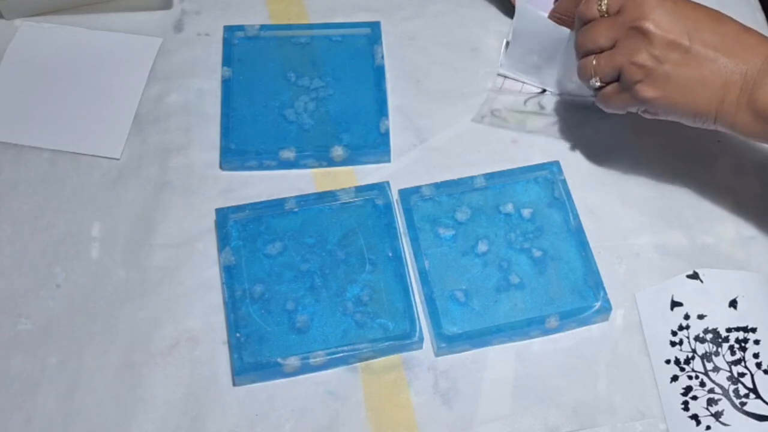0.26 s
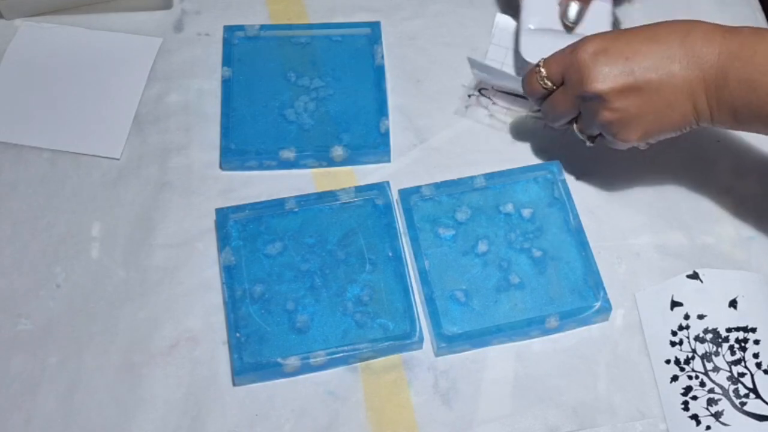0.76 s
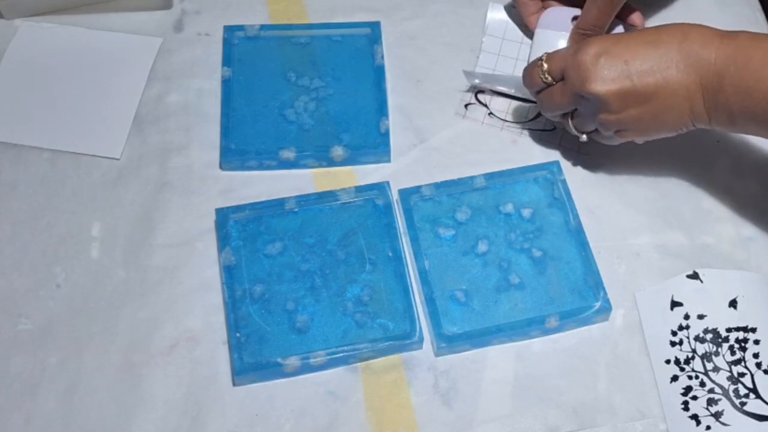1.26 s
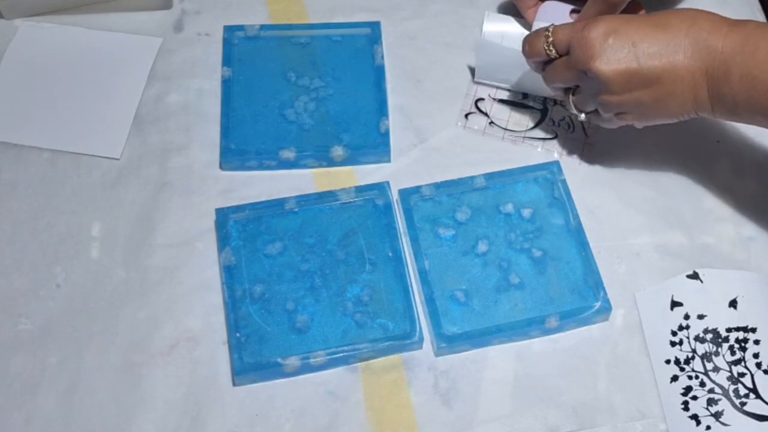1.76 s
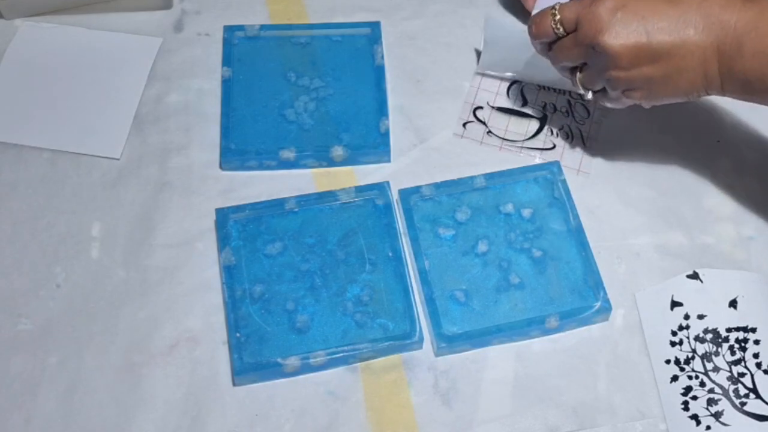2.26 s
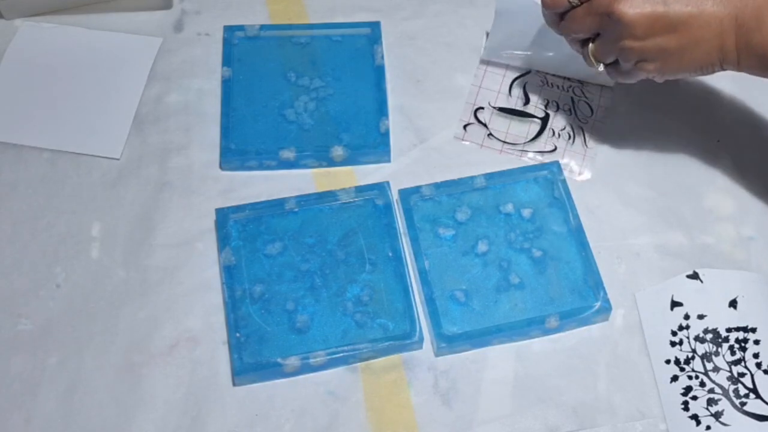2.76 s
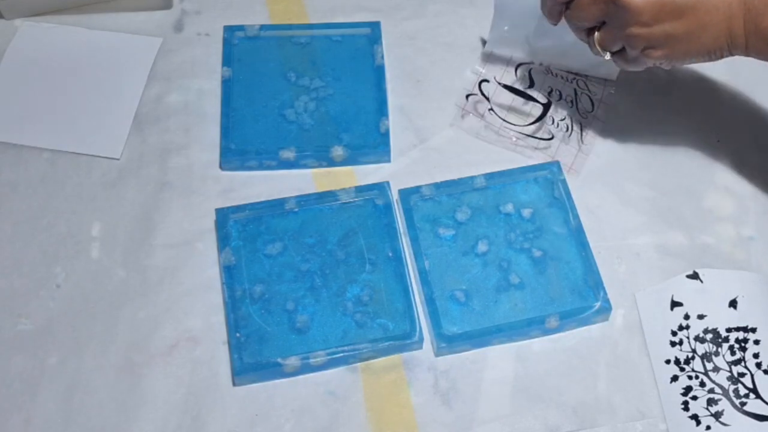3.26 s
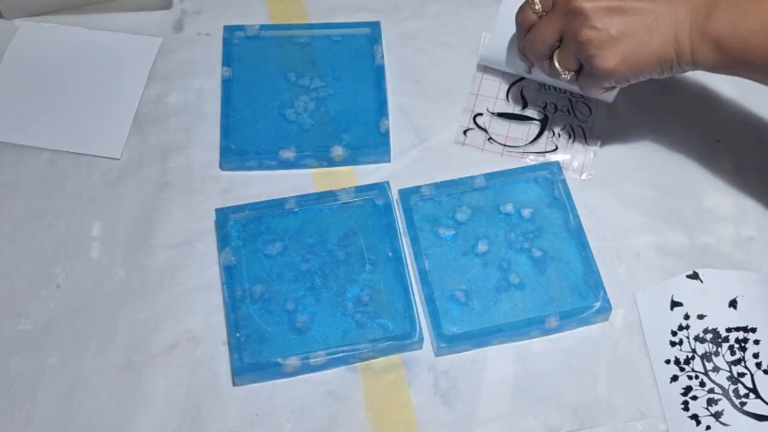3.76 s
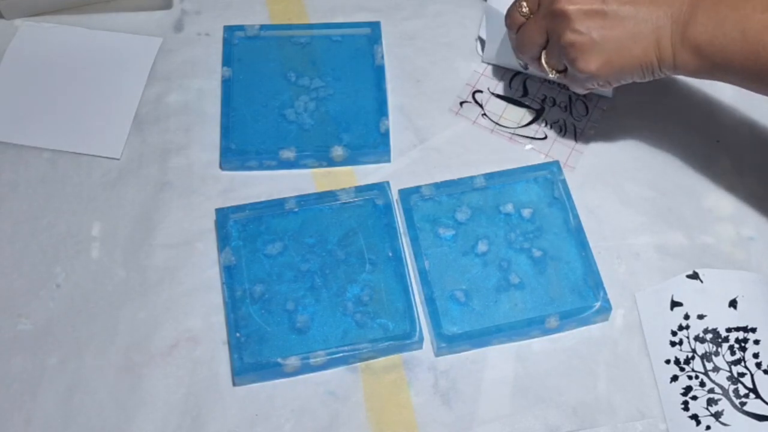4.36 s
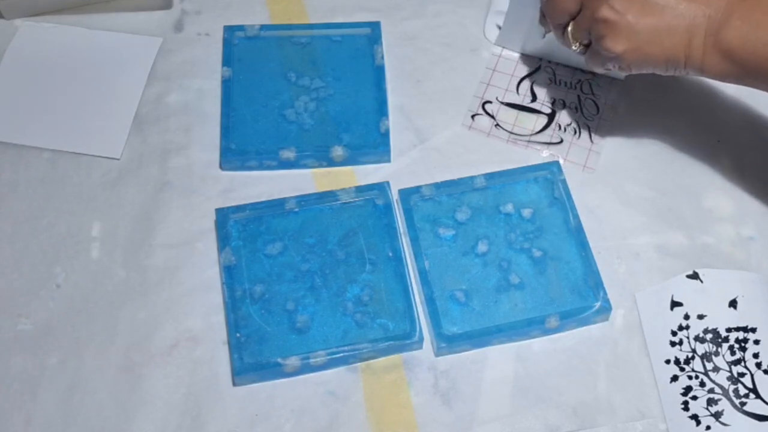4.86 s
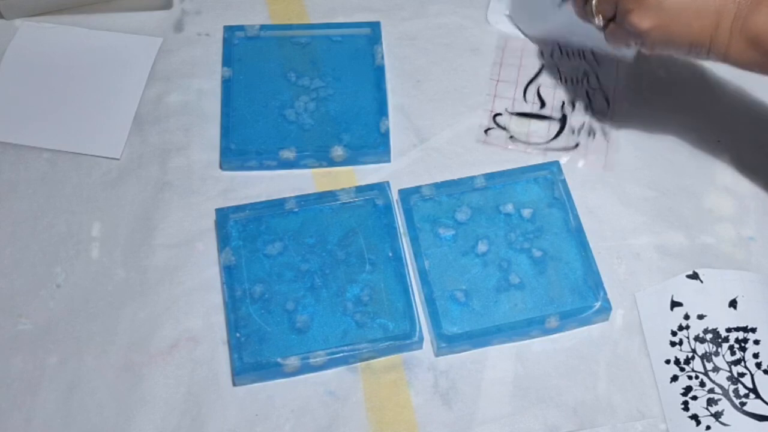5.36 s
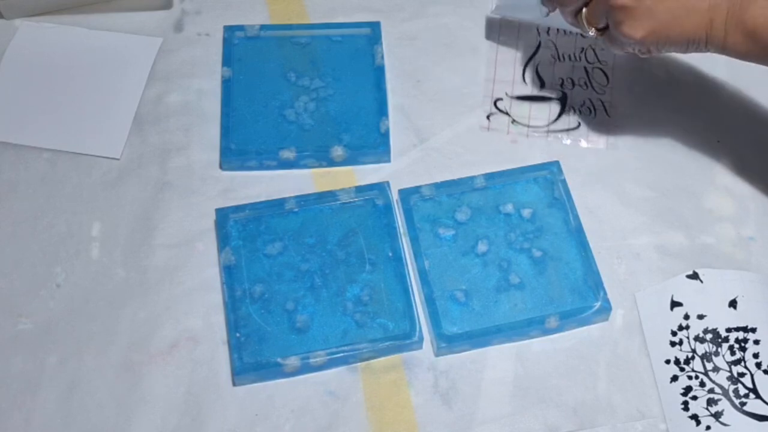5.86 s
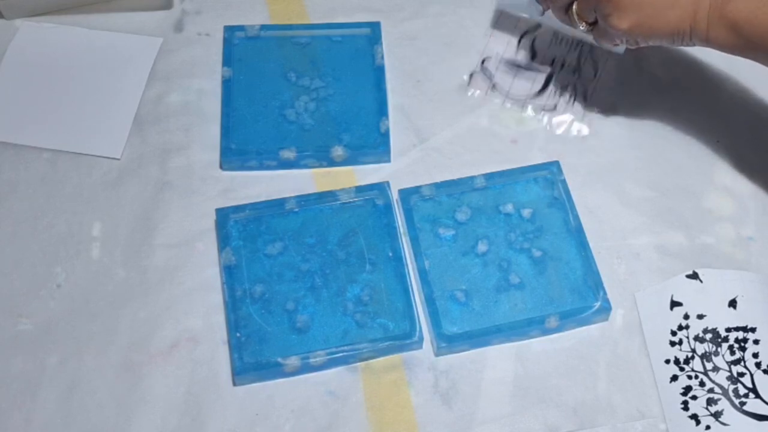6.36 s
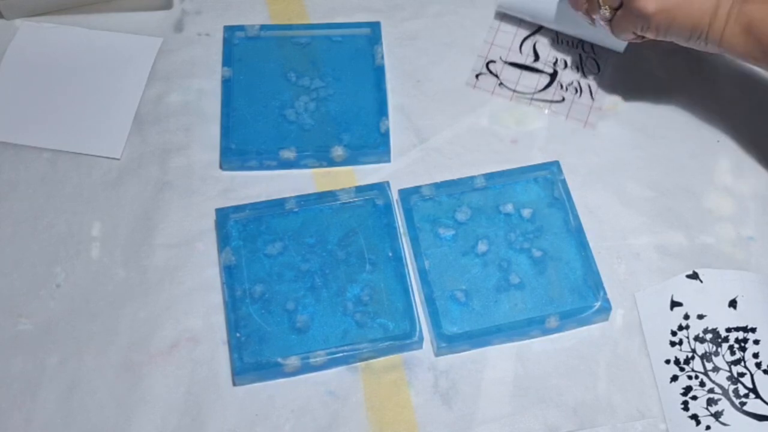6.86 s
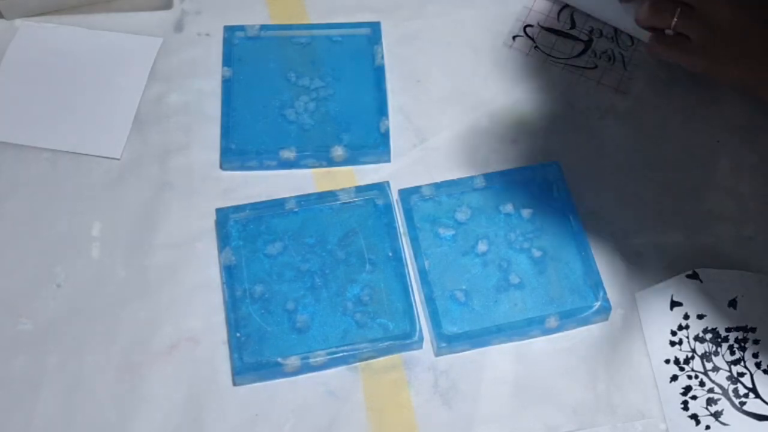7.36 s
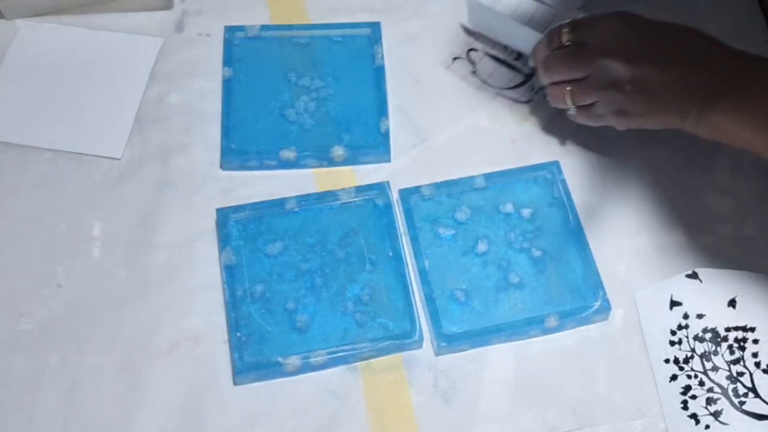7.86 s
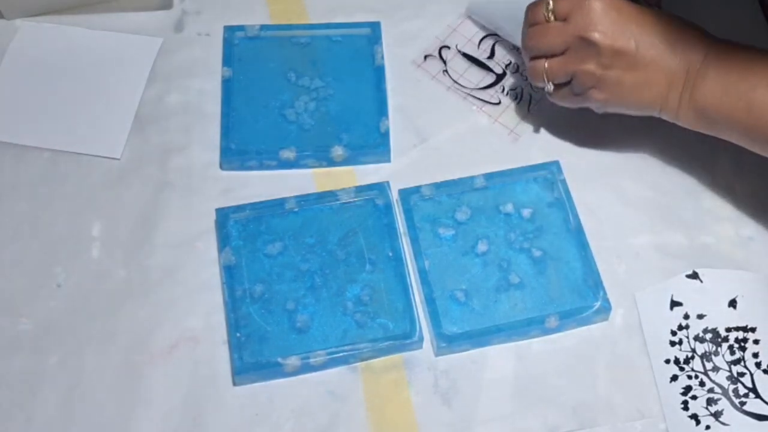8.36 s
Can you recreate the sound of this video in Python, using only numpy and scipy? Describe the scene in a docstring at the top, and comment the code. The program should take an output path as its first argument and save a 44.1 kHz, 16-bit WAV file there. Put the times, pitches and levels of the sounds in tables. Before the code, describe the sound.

At a table in a small room, hands pull a stiff backing sheet off sticky film. Glue crackles and the film slides while the sheet buckles in dull or bright snaps with hollow flaps. Soft low bumps come from the hands. Snaps crowd around 4.5 and 5.3 seconds, thin out, then return in a final flurry. Close stereo microphones catch quiet room air and a throbbing hum.

```python
"""From the start hands pull a stiff backing sheet off sticky tape at a table in a small room: glue crackles, film slides.
Over that come snaps, dull or bright, each with a hollow flap as the sheet buckles, and soft bumps of the hands on the table.
The snaps crowd together near 4.5 s and 5.3 s, then grow sparse; a hand drags softly over the table near 6.9 s.
A last flurry of snaps comes near 8.5 s. Room air and a low hum that throbs about every two seconds run throughout.
Snaps and crackle are shaped noise, flaps and booms are fading sine waves, and the hum is one wavering sine."""
import sys
import numpy as np
from scipy import signal
from scipy.fft import rfft, irfft, next_fast_len
from scipy.io import wavfile
from scipy.ndimage import uniform_filter1d

SR = 44100
rng = np.random.default_rng(int(sys.argv[2]) if len(sys.argv) > 2 else 0)


def master(y):
    """Save y as 16-bit WAV."""
    cut = np.clip(np.atleast_2d(y).T, -1, 1)
    pcm = np.round(cut * 32767)  # scale
    wavfile.write(sys.argv[1], SR, pcm.astype(np.int16))


N = 380141
TIME = np.arange(N) / SR

# the sheet buckles: t/s, pitch of the flapping panel f/Hz, flap level/dB, snap level/dB,
# brightness/dB (crack against snap); the layers are trimmed further in buckling()
BUCKLE_EVENTS = [(0.0985, 1070, -56.5, -57.5, -26), (0.209, 690, -75, -62, 1), (0.3356, 940, -50, -60, -21),
                 (0.3832, 748, -49.5, -67, -16), (0.4594, 874, -34.5, -42.5, 1.5),
                 (0.5141, 685, -45.5, -62, -4.5), (0.548, 1005, -41, -52, -3.5),
                 (0.5667, 977, -30, -25.5, -4), (0.57, 1078, -36, -24.5, -3.5),
                 (0.831, 1010, -46, -49.5, -19), (0.8366, 1110, -55, -43, -7.5),
                 (0.878, 1100, -67, -65.5, 7.5), (1.0165, 1024, -62, -63.5, -9),
                 (1.339, 1050, -39.5, -43, -14.5), (1.367, 860, -64, -35, -7), (1.473, 910, -80, -75, 11.5),
                 (1.519, 1040, -46, -44, -21), (1.55, 1010, -38.5, -45, -12), (1.7076, 960, -86, -67.5, 11),
                 (1.7212, 965, -50.5, -42, -33.5), (1.752, 790, -42, -53, -11),
                 (1.8158, 720, -77, -68, 11.5), (1.8758, 920, -27, -27.5, -4),
                 (1.9491, 1130, -54.5, -68.5, 15), (2.1864, 1040, -56.5, -49.5, 8),
                 (2.2548, 1130, -56, -58, 2), (2.276, 1100, -58, -64, 15), (2.317, 1170, -80, -59, 1),
                 (2.397, 930, -62, -59.5, 5.5), (2.429, 980, -66, -47.5, -1),
                 (2.658, 940, -76, -48.5, -3.5), (2.696, 938, -43.5, -29, -2.5),
                 (3.029, 935, -80, -58, -4.5), (3.343, 950, -35, -32, -17),
                 (3.3989, 1050, -41.5, -44.5, -32), (3.4399, 1110, -44, -29.5, -7.5),
                 (3.448, 1090, -40, -42.5, -0.5), (3.484, 1160, -56, -48.5, 0),
                 (3.611, 1000, -48.5, -68, -3), (3.732, 1060, -53.5, -69, -5),
                 (3.78, 1070, -55, -52.5, -12), (4.4652, 790, -33.5, -44, -33),
                 (4.4886, 860, -47, -47, -25), (4.4955, 920, -25.5, -28.5, -0.5),
                 (4.5237, 790, -30.5, -31, -10.5), (4.5482, 1027, -30, -33.5, -17.5),
                 (4.599, 950, -33.5, -39, -24), (4.6957, 1110, -59.5, -60.5, 6.5),
                 (4.8782, 1102, -48, -33.5, 7), (4.985, 823, -60, -71, 13.5), (5.129, 806, -48, -63, 3.5),
                 (5.1802, 850, -45.5, -69.5, 3), (5.27, 810, -50, -50.5, 10.5),
                 (5.2736, 818, -35, -47, 7.5), (5.3024, 803, -46.5, -43, 6.5), (5.3127, 748, -40, -44, 15),
                 (5.319, 827, -54, -38.5, -17.5), (5.3703, 860, -31, -32, 3.5),
                 (5.377, 852, -35.5, -27, -1.5), (5.3869, 845, -26, -34.5, -11),
                 (5.393, 787, -36, -27.5, -6.5), (5.812, 662, -60.5, -80, 7), (6.4159, 940, -60, -51, 3.5),
                 (7.1729, 865, -50, -55.5, -1.5), (7.258, 1070, -69, -58, -7),
                 (7.7244, 1230, -63, -49.5, 4), (7.8637, 810, -58.5, -59.5, -8),
                 (8.2856, 805, -49.5, -55, -16), (8.376, 880, -60, -56.5, 0.5),
                 (8.4345, 1110, -39, -42, -29), (8.4601, 1140, -31, -31, -17),
                 (8.4777, 1140, -24, -31.5, 4), (8.481, 1110, -37, -23.5, -18.5),
                 (8.497, 1210, -38, -39.5, -6), (8.5397, 713, -33, -63, -1), (8.572, 850, -60, -46.5, 4.5),
                 (8.59, 820, -65, -52.5, -3)]
DULL_BELOW_DB = -6   # a snap with less brightness than this counts as dull


def from_db(db):
    """Turn decibels into gain."""
    return 10 ** (np.asarray(db) / 20)


def rms_one(x):
    """Scale to an average power of 1."""
    return x / np.sqrt(np.mean(x ** 2) + 1e-20)


def at_hz(points, hz):
    """Read a table between its points, on a log-frequency axis."""
    f, value = np.transpose(points)
    return np.interp(np.log(hz + 1), np.log(f + 1), value)


def band(x, low_hz, high_hz, order=3):
    """Keep only the sound between two frequencies."""
    high_hz = min(high_hz, SR / 2 - 500)
    sos = signal.butter(order, [low_hz, high_hz], "band", fs=SR, output="sos")
    return signal.sosfilt(sos, x + 1e-18)


def soft_band(x, low_hz, high_hz):
    """Band-pass with a gentle foot and a steep top."""
    top = signal.butter(4, min(high_hz, SR / 2 - 500), fs=SR, output="sos")
    return signal.sosfilt(top, band(x, low_hz, high_hz, order=2))


def drift(rate):
    """Slow random wandering of spread 1, with `rate` new values per second."""
    knots = rng.standard_normal(int(N / SR * rate) + 2)
    return rms_one(np.interp(TIME * rate, np.arange(len(knots)), knots))


def stereo_noise(size, apart):
    """Noise that both sides share, plus a part of each side's own."""
    white = rng.standard_normal((3, *size))
    return white[0] + apart * white[1:]


def place(bursts, times, level_db):
    """Lay stereo bursts out in time; a level is the burst's energy spread over 10 ms."""
    length = bursts.shape[-1]
    out = np.zeros((2, N + length))
    power = np.mean(np.sum(bursts ** 2, axis=-1), axis=0) / (.01 * SR)
    for k, s in enumerate(times):
        start = max(int(s * SR), 0)
        out[:, start:start + length] += bursts[:, k] * from_db(level_db[k]) / np.sqrt(power[k])
    return out[:, :N]


def resonance(hz, centre_hz, width_hz):
    """Response of one damped mode, 1 at its centre."""
    return 1j * hz * width_hz / (centre_hz ** 2 - hz ** 2 + 1j * hz * width_hz)


def background():
    """Room air is noise of a set colour; the low hum is a slightly unsteady sine that throbs slowly and evenly."""
    # colour of the room air: f/Hz, relative level/dB per Hz
    air_colour = [(15, -34.5), (25, -4.5), (84, 1), (223, -17.5), (309, -2.5), (451, -13.5), (503, -1.5),
                  (560, -12), (1370, -10), (1610, -15.5), (1790, -12.5), (3430, -12.5), (7510, -27.5),
                  (13600, -26), (16000, -32.5)]
    air_db, hum_hz, hum_wander_hz, hum_waver_db = -69.5, 49.8, 1.1, 1.1
    swell_db, trough_db = -60, -79   # the swell is added to the trough
    throb_s, throb_peak_s = 2.11, 4.333
    throb_shape = 2.5   # the higher, the longer the hum stays low
    size = next_fast_len(N)
    hz = np.arange(size // 2 + 1) * SR / size
    spectrum = rfft(stereo_noise((size,), apart=1.0)) * from_db(at_hz(air_colour, hz))
    air = rms_one(irfft(spectrum, size))[:, :N]
    hum = np.sin(2 * np.pi * np.cumsum(hum_hz + hum_wander_hz * drift(6)) / SR)
    swell = np.abs(np.cos(np.pi * (TIME - throb_peak_s) / throb_s)) ** throb_shape
    throb = from_db(trough_db) + from_db(swell_db) * swell
    return from_db(air_db) * air + throb * from_db(hum_waver_db * drift(12)) * hum


def pulling():
    """Each pull swells and fades; a brighter one has less rub and more fizz. Power of rub, scrape, fizz and sizzle."""
    # the hand pulls the sheet: t/s of the fastest moment, rise/s, fall/s, scrape level/dB, brightness/dB
    pulls = [(0.029, 0.12, 0.04, -55.5, -4.5), (0.191, 0.075, 0.048, -62.5, -8.5),
             (.5, 0.062, 0.055, -59, -15.5), (.575, .015, 0.015, -41.5, -2),
             (1.05, 0.026, 0.045, -66.5, -4.5), (1.55, 0.047, 0.013, -54.5, -9.5),
             (1.78, 0.13, 0.075, -66, -10), (1.885, 0.023, 0.035, -50, -6), (2.2, 0.046, 0.11, -61.5, -2.5),
             (2.42, 0.052, 0.031, -62, 2), (2.63, 0.088, 0.12, -70.5, -0.5),
             (2.705, 0.022, 0.036, -54.5, 1.5), (2.989, 0.06, 0.13, -66, -6.5),
             (3.342, 0.0091, 0.013, -56.5, -19), (3.4, 0.025, 0.1, -55, -12),
             (3.779, 0.077, 0.048, -58.5, -3), (3.889, 0.035, .025, -65.5, -4),
             (4.299, .14, .1, -72.5, -2.5), (4.73, 0.23, .11, -66.5, -0.5),
             (4.885, 0.021, 0.065, -53, -0.5), (5.33, 0.039, 0.065, -46, 1), (5.58, 0.041, .1, -73.5, -4.5),
             (6.03, 0.16, 0.13, -72.5, 4), (6.2, 0.036, 0.026, -65.5, 1.5),
             (6.378, 0.065, 0.056, -57.5, 2.5), (6.83, 0.11, 0.18, -73, 3.5),
             (7.161, 0.11, 0.043, -67, 4.5), (7.34, 0.032, .04, -71, -1.5), (7.48, 0.039, 0.063, -71, 0.5),
             (7.659, 0.03, .03, -64, -1.5), (7.727, 0.015, .012, -59, 7), (7.775, 0.041, 0.044, -63.5, 3),
             (7.879, 0.035, 0.095, -75.5, 7), (8.258, 0.037, 0.021, -62, -4),
             (8.409, 0.02, 0.034, -66.5, -4), (8.58, 0.12, 0.12, -54, -5)]
    shape = 1.5   # 1 is a pointed swell, 2 a rounded one
    rub_db, fizz_db, sizzle_db = -4, 1, -6   # against the scrape
    rub_falls, sizzle_follows = .45, 1.1   # shares of the brightness
    power = np.zeros((4, N))
    for s, rise_s, fall_s, db, bright_db in pulls:
        near = np.abs(TIME - s) < 1 / 2
        t = TIME[near] - s
        swell = np.exp(-np.abs(t / np.where(t < 0, rise_s, fall_s)) ** shape)
        colour_db = np.array([rub_db - rub_falls * bright_db, 0, fizz_db + bright_db,
                              sizzle_db + sizzle_follows * bright_db])
        power[:, near] += np.outer(from_db(db + colour_db), swell) ** 2
    return power


def buckle_levels():
    """A sharper crease is brighter, most of all at its top edge. Levels of flap, snap, crack and edge in dB."""
    edge_offset_db, edge_follows, dull_follows = -11.5, 1.42, 1.2
    _, _, flap_db, snap_db, bright_db = np.transpose(BUCKLE_EVENTS)
    dullness_db = np.minimum(bright_db - DULL_BELOW_DB, 0)
    # a dull crease loses its edge fast
    edge_db = edge_offset_db + edge_follows * bright_db + dull_follows * dullness_db
    return flap_db, snap_db, snap_db + bright_db, snap_db + edge_db


def settling():
    """After a buckle the sheet slides on in a dying rustle. Power of rub, scrape, fizz and sizzle."""
    t60_s = 0.33   # time to fade by 60 dB
    share_db = np.array([-22, -21, -26, -18.5])   # against flap, snap, crack and edge
    kicks = np.zeros((4, N))
    starts = (np.array(BUCKLE_EVENTS)[:, 0] * SR).astype(int)
    kicks[:, starts] = from_db(np.array(buckle_levels()) + share_db[:, None]) ** 2
    return signal.lfilter([1], [1, -from_db(-60 / (t60_s * SR)) ** 2], kicks + 1e-18)


def crackle(low_hz, high_hz, per_s, size_db, smooth_db):
    """Tiny threads of glue and fibres let go at random, over the smooth hiss of sliding."""
    born = rng.random(N) < per_s / SR
    sizes = from_db(size_db * np.minimum(rng.exponential(1, N), 4))
    # each grain fades over about 4 ms
    grains = signal.lfilter([1], [1, -np.exp(-1 / (0.004 * SR))], born * sizes + 1e-18)
    friction = (rms_one(grains) + from_db(smooth_db)) * stereo_noise((N,), apart=0.56)
    return rms_one(band(friction, low_hz, high_hz, order=2))


def sheet_colour(hz):
    """Each resonance of sheet and table top together lifts or hollows out a band."""
    # resonances: centre f/Hz, width/Hz, boost level/dB (negative makes a hollow)
    sheet_modes = [(1284, 120, -7), (1522, 60, 6.5), (1611, 68, -17.5), (1660, 19, 7), (1790, 19, 7),
                   (2052, 50, 6.5), (2446, 190, -2), (2690, 17, 8), (2850, 30, 3), (3030, 39, 8),
                   (3500, 960, 4), (4720, 560, 5), (5810, 460, 6), (7040, 630, -2.5), (7830, 110, 4.5)]
    lifts = [1 + (from_db(db) - 1) * resonance(hz, centre, width) for centre, width, db in sheet_modes]
    return np.prod(lifts, axis=0)


def flexing(x, patchy_db):
    """The sheet's resonances colour the rustle; as it bends, patches of pitch grow louder and softer."""
    hz, _, frames = signal.stft(x, SR, nperseg=1024)
    patches = rng.standard_normal(frames.shape[1:])
    patches = uniform_filter1d(patches, size=5, axis=0)   # smooth over pitch
    patches = uniform_filter1d(patches, size=9, axis=1)   # smooth over time
    gain = from_db(patchy_db * rms_one(patches)) * np.abs(sheet_colour(hz))[:, None]
    return signal.istft(frames * rms_one(gain), SR)[1][:, :N]


def peeling():
    """The sheet slides over the table and the tape pulls away, with stray ticks where the glue holds on."""
    pull = pulling()
    rub_gain, scrape_gain, fizz_gain, sizzle_gain = np.sqrt(pull + settling())
    rub = rub_gain * crackle(550, 1400, per_s=130, size_db=6.5, smooth_db=4.5)
    scrape = scrape_gain * crackle(1600, 4000, per_s=480, size_db=5.5, smooth_db=0)
    fizz = fizz_gain * crackle(3300, 7000, per_s=380, size_db=4, smooth_db=-1.5)
    sizzle = sizzle_gain * crackle(8500, 16000, per_s=400, size_db=4.5, smooth_db=5)
    tick_gain = from_db(-8) * np.sqrt(pull[2])
    ticks = tick_gain * crackle(2500, 13000, per_s=30, size_db=5.5, smooth_db=-29)
    return flexing(rub + scrape + fizz + sizzle + ticks, patchy_db=1.8)


def room(x, t60, treble_t60, treble_db, gap_s):
    """A short diffuse tail from the nearby walls, different on each side."""
    t = TIME[:SR // 2]
    white = rng.standard_normal((2, len(t)))
    tail = band(white, 200, 6200, order=2) * from_db(-60 * t / t60)
    treble = band(white[::-1], 5500, 17000, order=2) * from_db(-60 * t / treble_t60)
    tail += from_db(treble_db) * treble
    # the tail builds up after a short gap
    tail *= (1 - np.exp(-(t / gap_s) ** 2)) / np.sqrt(SR * t60 / np.log(1e6))
    return signal.fftconvolve(x, tail, axes=1)[:, :N]


def bumps(rise_s, boom_s, knock_s):
    """A soft hand sets the table top booming (a fading sine), with a dull knock (a burst of noise)."""
    # hands on the table: t/s, boom level/dB, boom f/Hz, knock level/dB; both levels before the trims below
    hits = [(.009, -44.5, 79, -63.5), (0.561, -56.5, 86, -69), (1.535, -63, 62, -66), (2.099, -45, 76, -77),
            (2.212, -49.5, 75.6, -58), (2.436, -43.5, 77, -65), (2.559, -52, 83, -62),
            (2.723, -38.5, 83, -62.5), (3.028, -74, 61.5, -68), (3.352, -46, 113, -54),
            (3.39, -52, 116.6, -57.5), (3.708, -58.5, 61, -66), (4.502, -64.5, 118, -51),
            (4.526, -53.5, 125, -53), (4.905, -52, 92.6, -65), (4.963, -56, 75, -69), (5.091, -67, 70, -61),
            (5.191, -70, 68, -62), (5.279, -60, 86, -50.5), (5.323, -36.5, 84.5, -47),
            (5.38, -41.5, 78.2, -51), (7.157, -62, 133, -65), (8.488, -54, 86, -54.5)]
    s, boom_db, boom_hz, knock_db = np.transpose(hits)
    t = TIME[:SR // 3]
    onset = 1 - np.exp(-t / rise_s)
    boom = onset * np.exp(-t / boom_s) * np.sin(2 * np.pi * boom_hz[:, None] * t)
    knock = stereo_noise((len(s), len(t)), apart=0.85) * onset * np.exp(-t / knock_s)
    knock = band(knock, 94, 460)
    booms = place(np.array([boom, boom]), s, boom_db)
    return from_db(-1.0) * booms + from_db(2.0) * place(knock, s, knock_db)


def flaps(times, pitch_hz, level_db, scatter_db, detune, focus_db, rise_s):
    """The panel swings over and rings for a few cycles; the modes nearest the pitch of the bend ring most."""
    # modes of the bent panel: f/Hz, level/dB, time to fade by 60 dB/s
    panel_modes = [(640, -6, 0.067), (760, -17.5, 0.028), (807.7, 3.5, 0.04), (866, -2.5, 0.033),
                   (985, -7.5, 0.052), (1120, -7, 0.074), (1212, -2.5, 0.033), (1395, -5, 0.071)]
    t, out = TIME[:SR // 14], 0
    for mode_hz, mode_db, t60 in panel_modes:
        strength, bend, phase = rng.standard_normal((len(times), 3)).T[:, :, None]
        octaves_off = np.abs(np.log2(mode_hz / pitch_hz[:, None]))
        gain = from_db(mode_db + scatter_db * strength - focus_db * octaves_off)
        tone = np.sin(2 * np.pi * mode_hz * (1 + detune * bend) * t + np.pi * phase)
        out = out + gain * from_db(-60 * t / t60) * tone
    return place(np.array([out, out]) * (1 - np.exp(-t / rise_s)), times, level_db)


def ragged(count, size):
    """A crease gives way in fits and starts: a gain that jumps about within each snap."""
    fits = rms_one(uniform_filter1d(rng.standard_normal((count, size)), size=48, axis=1))
    return from_db(2 * fits)   # spread of 2 dB


def snaps(times, ring_hz, level_db, low_hz, high_hz, crack_s, shiver_s, shiver_db, apart, facet_db, facet_width_hz):
    """A crease gives way quickly, then bending waves shiver across the sheet and ring the facets beside it."""
    rise_at_ref_s, ref_hz, rise_follows = 0.00064, 3000, 1.2
    ring_db, ring_q = -0.5, 6.5   # lift and sharpness of the crease's main ring
    size = next_fast_len(SR // 14)
    t, hz = TIME[:size], np.arange(size // 2 + 1) * SR / size
    ring_hz = ring_hz[:, None]
    envelope = np.exp(-t / crack_s) + from_db(shiver_db) * np.exp(-t / shiver_s)
    # the lower a crease rings, the more slowly it gives way
    rise_s = rise_at_ref_s * (ref_hz / ring_hz) ** rise_follows
    envelope = envelope * (1 - np.exp(-t / rise_s)) * ragged(len(times), size)
    bursts = stereo_noise((len(times), size), apart) * envelope
    facets_hz = rng.uniform(low_hz, high_hz, size=(len(times), 3, 1))
    facets = 1 + from_db(facet_db) * resonance(hz, facets_hz, facet_width_hz).sum(axis=1)
    main_ring = 1 + from_db(ring_db) * resonance(hz, ring_hz, ring_hz / ring_q)
    bursts = irfft(rfft(bursts) * sheet_colour(hz) * facets * main_ring, size)
    return place(soft_band(bursts, low_hz, high_hz), times, level_db)


def buckling():
    """Every buckle is a hollow flap of fading sines under a dull or bright snap made of noise bands."""
    ring_ratio = 3.134   # main ring of a crease against the pitch of its flap
    dull_db_per_octave = 23.5   # a dull crease also rings lower
    s, pitch_hz, _, _, bright_db = np.transpose(BUCKLE_EVENTS)
    flap_db, snap_db, crack_db, edge_db = buckle_levels()
    dullness_db = np.minimum(bright_db - DULL_BELOW_DB, 0)
    ring_hz = ring_ratio * pitch_hz * 2 ** (dullness_db / dull_db_per_octave)
    flap = flaps(s, pitch_hz, flap_db, scatter_db=3.5, detune=0.015, focus_db=20.5, rise_s=0.003)
    puff = snaps(s, ring_hz, flap_db, 400, 1400, crack_s=0.0042, shiver_s=0.025, shiver_db=-6.5,
                 apart=1.0, facet_db=-1, facet_width_hz=360)
    snap = snaps(s, ring_hz, snap_db, 1450, 4250, crack_s=.0035, shiver_s=0.013, shiver_db=-7,
                 apart=1.0, facet_db=2.0, facet_width_hz=110)
    crack = snaps(s, ring_hz, crack_db, 4200, 8700, crack_s=0.002, shiver_s=0.01, shiver_db=-7.5,
                  apart=1.0, facet_db=3.5, facet_width_hz=97)
    edge = snaps(s, ring_hz, edge_db, 9000, 15500, crack_s=.0006, shiver_s=.007, shiver_db=-8.0,
                 apart=0.78, facet_db=13, facet_width_hz=350)
    low = from_db(-2.5) * flap + from_db(-10.5) * puff
    return low + from_db(-0.34) * snap + from_db(0.5) * crack + from_db(-2.0) * edge


def table_top():
    """The settling sheet and one dragging hand rub the table top into a soft, low murmur of its resonances."""
    # resonances of the table top: f/Hz, width/Hz, level/dB
    top_modes = [(312, 57, 3), (500, 23, -5), (640, 90, -11)]
    drag_from_s, drag_to_s, drag_db = 6.67, 7.13, -70
    shake_db = -4   # the table's answer to the sheet's rub
    size = next_fast_len(N)
    hz = np.arange(size // 2 + 1) * SR / size
    body = sum(from_db(db) * np.abs(resonance(hz, centre, width)) ** 2 for centre, width, db in top_modes)
    # skin catching and slipping
    slips = crackle(250, 900, per_s=82, size_db=1, smooth_db=2.5)
    drag = np.exp(-((2 * TIME - drag_from_s - drag_to_s) / (drag_to_s - drag_from_s)) ** 4)
    gain = from_db(drag_db) * drag + from_db(shake_db) * np.sqrt(settling()[0])
    return gain * rms_one(irfft(rfft(slips, size) * body, size)[:, :N])


def microphones(x):
    """Two ports hear the table with different delay and shading."""
    # lead of the left microphone: f/Hz, phase/rad
    lead = [(60, 0), (500, .05), (860, -.2), (1120, 1.5), (1720, .6), (2150, 1.7), (2580, 1.4), (3360, 2.6),
            (5250, 3.4), (7490, 5.7), (9600, 6.3), (15700, 6.3)]
    # left minus right: f/Hz, level/dB
    tilt = [(60, -4.5), (110, -1), (200, -6.5), (380, -2.5), (700, -3), (1290, -4), (2380, -1.5),
            (4400, -3.5), (8120, -0.5), (15000, -1.5)]
    size = next_fast_len(N + SR // 10)
    hz = np.arange(size // 2 + 1) * SR / size
    shade = from_db(at_hz(tilt, hz) / 2)
    right = np.exp(-1j * at_hz(lead, hz)) / shade
    return irfft(rfft(x, size) * [shade, right], size)[:, :N]


def scene():
    """The sheet close by, its room, the table and the background."""
    sheet = buckling() + peeling()
    walls = room(sheet, t60=0.17, treble_t60=0.19, treble_db=-24.0, gap_s=0.0022)
    # the low flap radiates poorly, so the walls return mostly the snap
    walls = from_db(-5.5) * band(walls, 1400, 17000, order=1)
    table = bumps(rise_s=0.012, boom_s=0.03, knock_s=0.034) + table_top()
    return microphones(sheet + table + background()) + walls


def record(dry):
    """Cut the top steeply above 15.9 kHz."""
    return signal.sosfilt(signal.ellip(10, .1, 80, 15900, fs=SR, output="sos"), dry)


dry = scene()
out = record(dry)
master(out)
```